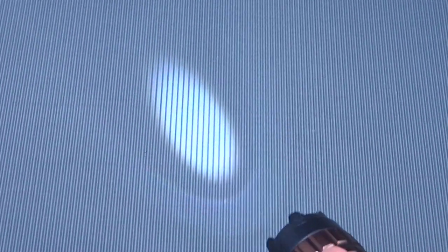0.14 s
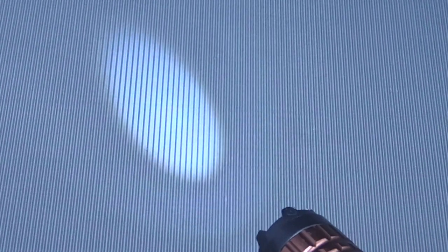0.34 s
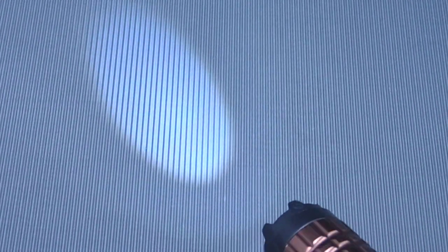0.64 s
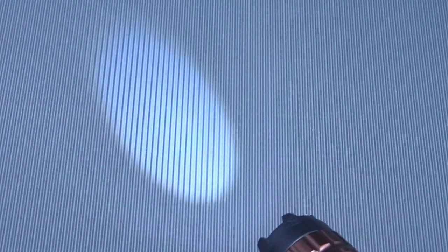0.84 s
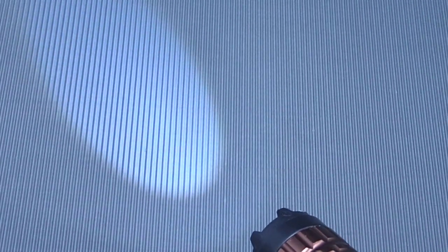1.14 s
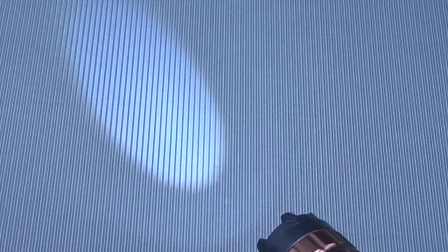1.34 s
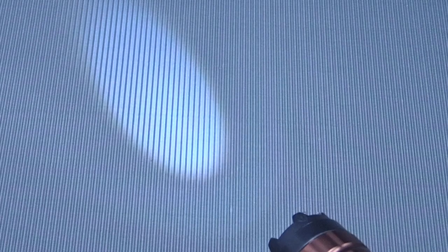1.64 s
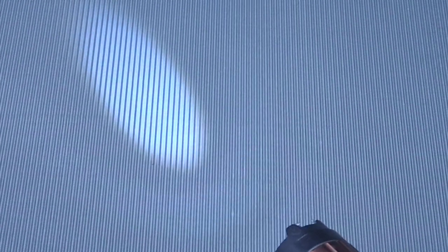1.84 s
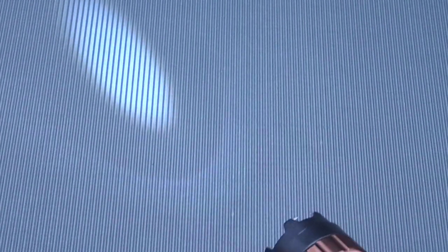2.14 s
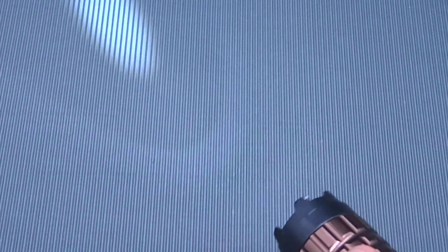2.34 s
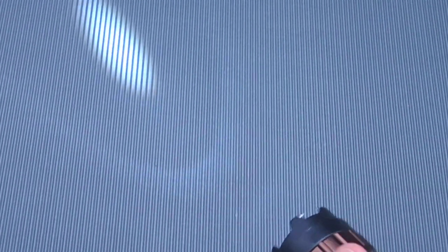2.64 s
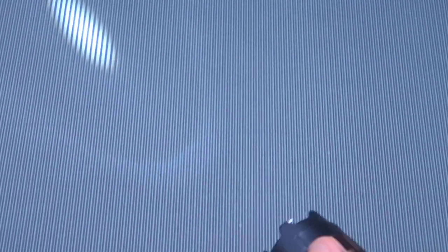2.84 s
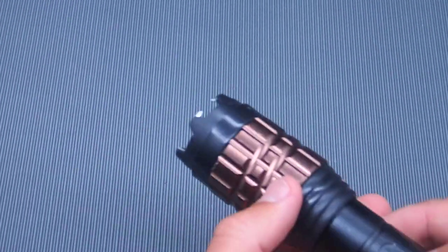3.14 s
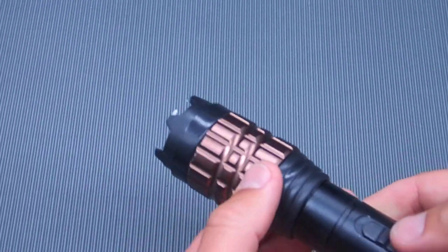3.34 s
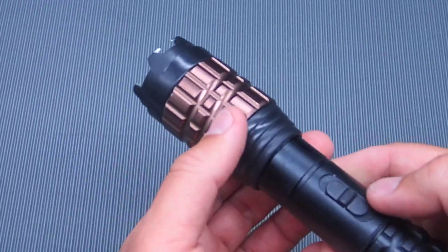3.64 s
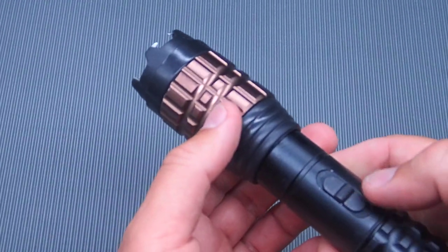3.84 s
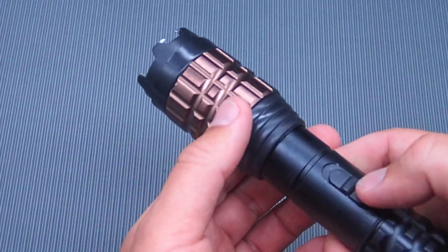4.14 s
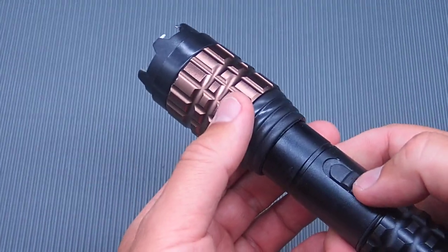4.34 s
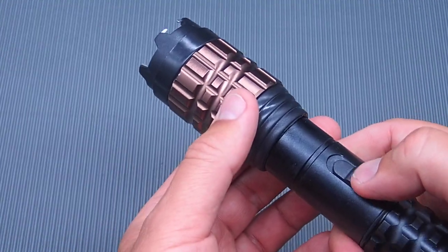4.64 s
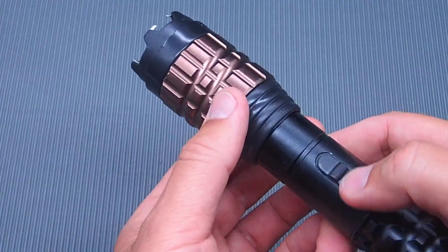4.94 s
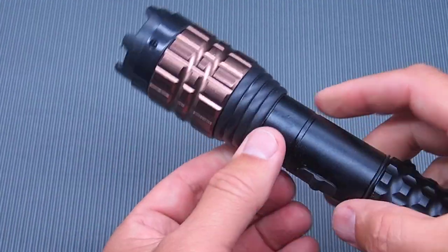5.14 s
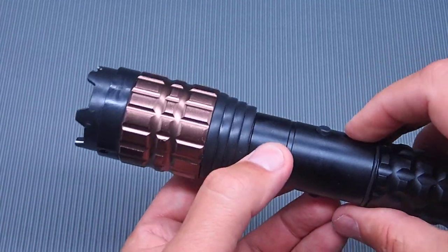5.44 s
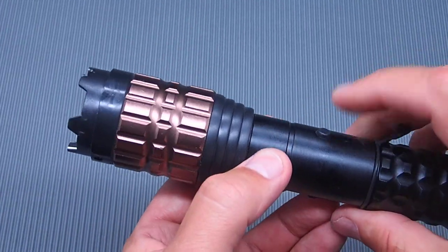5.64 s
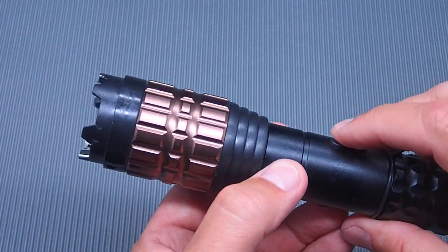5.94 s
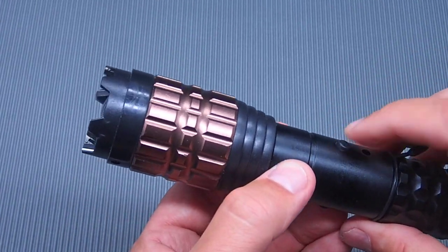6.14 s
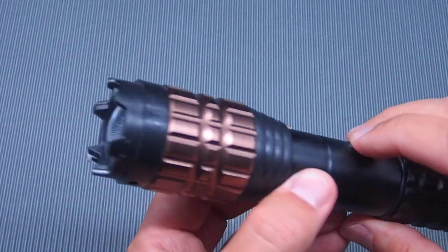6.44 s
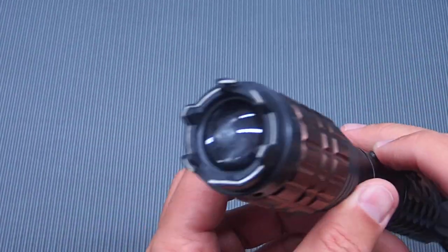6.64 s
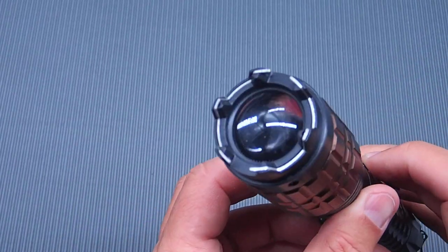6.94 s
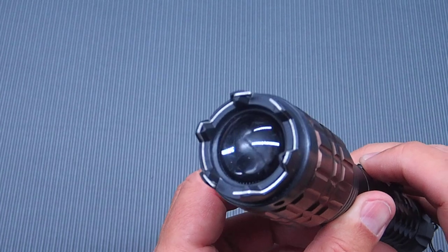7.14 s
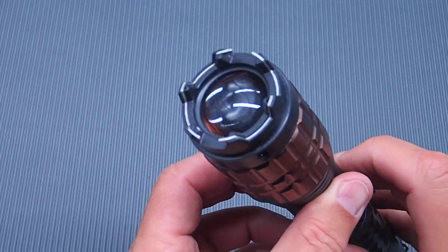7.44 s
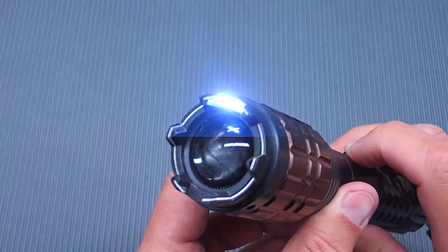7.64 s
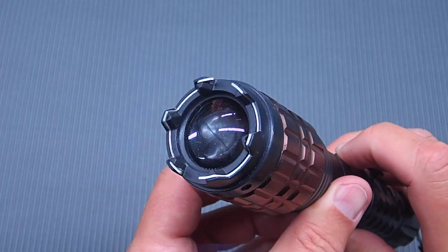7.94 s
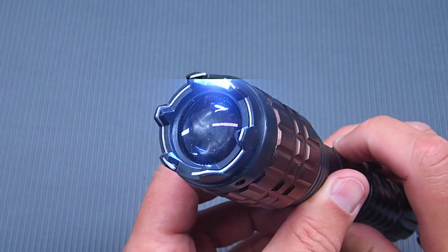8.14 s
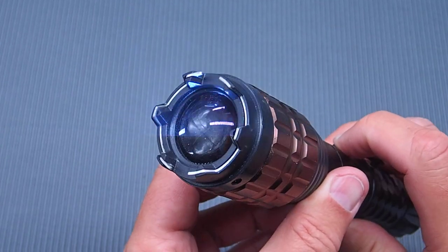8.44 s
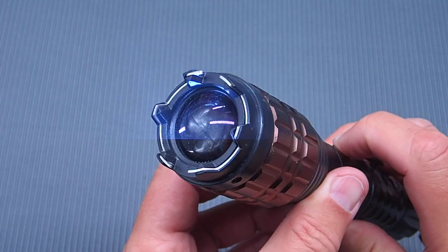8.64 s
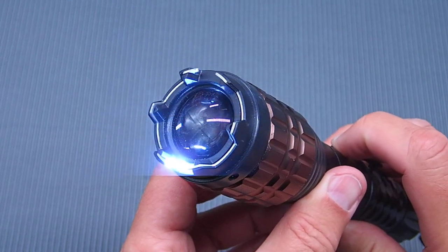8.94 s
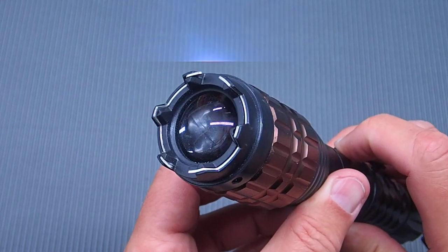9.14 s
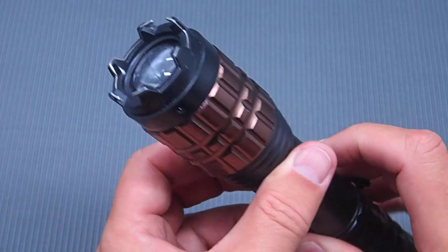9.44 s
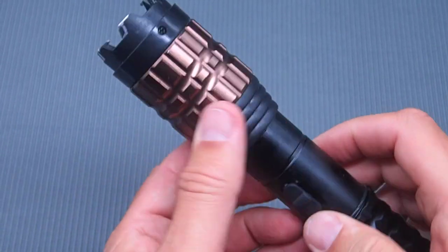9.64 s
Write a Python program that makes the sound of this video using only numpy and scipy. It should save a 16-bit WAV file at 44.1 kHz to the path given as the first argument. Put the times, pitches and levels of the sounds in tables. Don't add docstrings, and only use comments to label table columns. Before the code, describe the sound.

Close to a camera microphone in a small room, a torch's lens ring is twisted in short turns from 0.2 to 2.75 seconds. Each turn gives a quick run of two to six loud, sharp ratchet clicks, bright and brittle, ringing near 5.5 kHz, with small ticks of slack between. From 3.0 to 3.5 fingers rub softly and knock the hollow body. After a quiet gap, a slide switch snaps hard at 4.7 with a tiny bounce. From 5.0 to 6.9 come light taps and dry rubs, with a firmer knock at 6.8. A trigger double-clicks at 7.04, and at once a sharp first crack opens a harsh electric crackle, about 43 sparks a second, slightly irregular, with small low puffs beneath. It runs steadily until 9.4, then stops abruptly with a short tail. Faint room hiss ducks under loud sounds and creeps back.

```python
import sys
import numpy as np
from scipy import signal
from scipy.fft import rfft, irfft, next_fast_len
from scipy.io import wavfile
from scipy.ndimage import uniform_filter1d, minimum_filter1d

SR = 44100
rng = np.random.default_rng(int(sys.argv[2]) if len(sys.argv) > 2 else 0)


def master(y):
    cut = np.clip(np.atleast_2d(y).T, -1, 1)
    pcm = np.round(cut * 32767)
    wavfile.write(sys.argv[1], SR, pcm.astype(np.int16))


def invert_db(x):
    u = np.asarray(x, float) / 20
    return 10 ** u


N = 432621
T = np.arange(N) / SR

# (frequency [Hz], density [dB per Hz])
ROOM_SPECTRUM = [(20, -17.5), (92, -5.5), (530, -3.5), (800, -4.5), (1300, -6.5), (1900, -12), (2700, -20),
                 (3160, -17), (4200, -26.5), (4870, -10.5), (6500, -10.5), (8050, -7), (9500, -14),
                 (15500, -17.5)]
# (frequency [Hz], likeness [-1 to 1])
ROOM_LIKENESS = [(60, 0.088), (300, 0.31), (700, -0.11), (3100, 0.23), (6800, -0.43), (15000, 0.26)]
# (frequency [Hz], width [Hz], level [dB])
WHINES = [(4570, 31, -75), (6200, 35, -71), (8050, 60, -71)]
ROOM_DB = -53.5

# (time of maximum [s], level [dB], swell [s], fade [s]), both over STROKE_DB
STROKES = [(0.0, -34, .01, 0.025), (3.068, -41.5, 0.12, 0.48), (3.37, -49, 0.042, 0.065),
           (3.44, -54, 0.08, 0.12), (3.51, -57.5, 0.12, 0.0142), (5.21, -41.5, 0.013, 0.19),
           (5.33, -43, 0.07, 0.034), (5.462, -52, 0.069, 0.015), (5.827, -44.5, 0.011, 0.074),
           (5.986, -47.5, 0.0047, 0.072), (6.075, -39.5, 0.0035, 0.024), (6.53, -52, 0.11, .018),
           (6.766, -43, 0.22, 0.08), (6.832, -40, 0.008, 0.021), (6.91, -49, 0.045, .063)]
# (frequency [Hz], density [dB per Hz])
RUB_SPECTRUM = [(1470, -77.5), (2500, -21), (3130, -18), (4050, -21), (5190, 1), (6700, -8), (8080, -11.5),
                (9810, -23), (14600, -24.5), (16000, -8)]
STROKE_DB = 15

# (time [s], peak [dB], body minus peak [dB])
TAPS = [(3.3486, -35.5, -17), (4.959, -41.5, -20), (5.2071, -42, -22), (5.2125, -42, -22),
        (5.2253, -37, -16), (5.3597, -41, -19), (5.8205, -39, -15), (5.8767, -43, -20), (5.914, -47, -18),
        (5.9836, -47, -22), (6.074, -34, -32), (6.1559, -43.5, -24), (6.3, -30.5, -19.5),
        (6.6694, -40, -20)]
# (time [s], peak [dB], top minus peak [dB], body minus peak [dB])
KNOCKS = [
    (3.151, -36.5, -28, -20),
    (6.8315, -27.5, -32, -16.5),
    (6.839, -48, -32, -23),
]
# (time [s], peak [dB], top minus peak [dB], body minus peak [dB])
SWITCHES = [
    (4.6842, -5.5, -25, -38.5),
    (4.6905, -12, -33, -42),
    (7.0428, -14, -23.5, -31.5),
    (7.0478, -15, -22.5, -41.5),
]
# (time [s], peak [dB], top minus peak [dB], tick minus peak [dB], drag [dB])
TURNS = [
    (0.2155, -3, -10, -14, -12.5),
    (0.5944, -2.5, -5, -32, -9),
    (0.8915, 2, -10, -28, -17),
    (1.2488, 0, -10.5, -39, -29),
    (1.68, -0.5, -13, -29, -14.5),
    (2.0087, -5.5, -14.5, -34, -15),
    (2.3343, -6.5, -5, -26, -15.5),
    (2.6531, 1, -12, -37, -16.5),
]
# (time [s], peak [dB], top minus peak [dB], body minus peak [dB])
DETENTS = [(0.2358, -5, -8, -45), (0.2549, -7, -7, -43), (0.3021, -5.5, -5.5, -38.5),
           (0.3721, -6, -12, -39.5), (0.6014, -6.5, -30.5, -38.5), (0.6134, -3, -11.5, -44),
           (0.636, -4, -8.5, -45), (0.6728, -5, -13.5, -40), (0.9138, -12, -8.5, -32.5),
           (0.944, -9, -22, -57), (1.29, -3.5, -11, -42.5), (1.3369, -4, -4.5, -36.5),
           (1.3597, 0, -13, -42), (1.3837, -2.5, -19.5, -45.5), (1.4241, -5, -17, -36.5),
           (1.7107, -2.5, -12, -36), (1.742, -5.5, -10, -38), (1.781, -8.5, -10, -37),
           (2.02, -11, -28, -44), (2.0397, -6, -14, -37), (2.0706, -4, -14, -37.5), (2.0774, -16, -21, -44),
           (2.0986, -10.5, -7, -37), (2.1069, -9.5, -12, -48), (2.353, -9, -17, -39), (2.383, -9, -19, -48),
           (2.4276, -12.5, -11, -39), (2.6853, -3, -18, -44), (2.7106, -9, -19, -38)]
# (time [s], peak [dB], top minus peak [dB], body minus peak [dB])
SLACK = [(0.177, -37, -16, -26), (0.5087, -41, -15, -23), (0.5513, -21.5, -29, -31),
         (0.826, -42, -18.5, -23), (1.0091, -35.5, -25, -28), (1.6097, -45.5, -20, -27),
         (1.8529, -24, -7, -26.5), (2.173, -29, -6, -23), (2.2962, -36.5, -13, -20), (2.319, -25, -25, -28),
         (2.4235, -28, -15, -20), (2.5077, -41.5, -20, -30), (2.588, -36, -31, -41),
         (2.611, -20.5, -35, -27), (2.836, -38.5, -20, -16)]
# (time of maximum [s], peak [dB], frequency [Hz])
IMPACTS = [(0.2169, -6, 5510), (0.2202, -12, 5640), (0.2377, -10, 5780), (0.2405, -12, 6050),
           (0.2571, -9, 5550), (0.3041, -8, 5660), (0.3075, -12, 5340), (0.3737, -8, 5560),
           (0.3757, -10, 5780), (0.5906, -12, 5330), (0.5963, -6, 5930), (0.6017, -7, 5440),
           (0.6146, -7, 5830), (0.6179, -8, 5490), (0.6207, -11, 5440), (0.6376, -7, 5960),
           (0.6394, -10, 5520), (0.6753, -9, 5390), (0.891, -12, 5230), (0.8935, -6, 5100),
           (0.8951, -8, 5770), (0.8982, -8, 5150), (0.9146, -9, 5400), (0.9168, -11, 5450),
           (0.9465, -9, 5360), (1.2496, -7, 5580), (1.2525, -7, 5460), (1.2573, -10, 5700),
           (1.2915, -7, 5580), (1.2946, -10, 5020), (1.3379, -8, 5500), (1.3395, -8, 5280),
           (1.3605, -12, 5870), (1.3634, -8, 5720), (1.367, -11, 5470), (1.3866, -8, 5380),
           (1.3916, -11, 5200), (1.6819, -12, 5840), (1.6837, -6, 5540), (1.686, -9, 5510),
           (1.7126, -6, 5330), (1.7174, -9, 5290), (1.7462, -9, 5630), (1.7831, -10, 5190),
           (2.0144, -8, 5390), (2.0163, -12, 5470), (2.02, -10, 5570), (2.0415, -10, 5280),
           (2.0434, -10, 5800), (2.0727, -11, 5090), (2.0778, -9, 5580), (2.1029, -9, 5390),
           (2.3364, -6, 5190), (2.3864, -12, 5590), (2.6561, -9, 5190), (2.6581, -8, 5420),
           (2.6877, -8, 5770), (2.6896, -9, 5690), (4.6878, -9, 5740), (4.6919, -7, 5350)]
# (frequency [Hz], density [dB per Hz])
RATCHET_RING = [(2060, -66.5), (3500, -38.5), (4170, -39.5), (4530, -9.5), (4700, -20), (5010, -2.5),
                (5220, 2), (6750, -10.5), (8080, -13), (9060, -28.5), (10500, -27), (13600, -34),
                (22000, -120)]
# (frequency [Hz], density [dB per Hz])
TAP_RING = [(1290, -66.5), (2200, -27), (4200, -19.5), (4720, -20), (5090, 0), (5300, 1), (6640, -3.5),
            (7900, -4.5), (9970, -15), (10700, -15.5), (12400, -40), (15000, -18.5), (16000, -27.5)]
# (frequency [Hz], density [dB per Hz])
THIN_METAL = [(5880, -51.5), (10000, -12), (10600, -21), (11900, -13.5), (13300, 4), (13700, -1.5),
              (16000, -15.5)]
# (frequency [Hz], density [dB per Hz])
HOLLOW_BODY = [(500, -53.5), (780, 3), (1000, -7.5), (1500, -0.5), (1900, -7.5), (3000, -7.5), (4000, -13),
               (4500, -52.5)]
# (frequency [Hz], density [dB per Hz])
TICK_SPECTRUM = [(300, -50.5), (1500, 4), (3000, 7), (16000, 0.5)]
# (frequency [Hz], density [dB per Hz])
STRIKE_EDGE = [(1500, -34), (3000, -17.5), (4000, -10), (4800, -1), (7000, -4), (8500, -1), (10500, -11.5),
               (13300, -0.5), (16000, -12.5)]
# (frequency [Hz], level [dB], T60 [s])
STRUCK_MODES = [(5275, 1, 0.066), (5300, -5, 0.022), (5200, 11.5, 0.011), (13350, -24.5, .02)]
DETENT_KNOCK_HZ, TAP_KNOCK_HZ = (789, 1538), (997, 1240, 1410)
DRAG_LEAD_S, DRAG_TOP_DB, DRAG_BODY_DB, TAP_TOP_DB = 0.013, -41, -31, -21
TURN_T60_S, TURN_BODY_DB, SHARP_TICK_DB, BODY_LOSS = 0.066, -40, -31.5, 2.3
# (tick minus peak [dB], T60 [s])
DETENT_SNAP, SLACK_SNAP, DRAG_SNAP = (-35.5, 0.074), (-26, 0.073), (-45, 0.14)
SWITCH_SNAP, TAP_SNAP, KNOCK_SNAP = (-22.5, 0.045), (-25, 0.084), (-16, 0.016)
IMPACT_MS, IMPACT_TICK_DB, IMPACT_LIKENESS = 0.65, -13, 0.8
HAND_LIMIT_DB, STRIKE_KNEE_DB = -13, -20

GATE_DB, GATE_SLOPE, HOLD_S, RELEASE_DB_PER_S = -17.5, 0.92, 0.085, 80
SPARK_DUCK_DB, SPARK_HOLD_S = -27, 0.084

# (start [s], sparks [count], gap [0 or 1])
STRETCHES = [(7.0633, 1, 0), (7.089, 5, 0), (7.2112, 1, 1), (7.2335, 5, 0), (7.3493, 4, 1), (7.4418, 1, 0),
             (7.4648, 5, 1), (7.5789, 3, 1), (7.6468, 2, 0), (7.693, 5, 1), (7.8032, 1, 0), (7.8248, 2, 1),
             (7.8728, 3, 0), (7.9398, 1, 1), (7.9636, 1, 0), (7.9863, 5, 1), (8.106, 5, 0), (8.2267, 1, 1),
             (8.2497, 1, 0), (8.2717, 1, 1), (8.2952, 1, 0), (8.3175, 2, 1), (8.3627, 1, 0), (8.3871, 5, 1),
             (8.497, 4, 1), (8.5858, 1, 0), (8.609, 1, 1), (8.6318, 1, 0), (8.6518, 2, 1), (8.6967, 1, 0),
             (8.7184, 1, 1), (8.7425, 1, 0), (8.7646, 1, 1), (8.7869, 5, 0), (8.9052, 5, 1), (9.0207, 2, 1),
             (9.0687, 5, 0), (9.194, 1, 0), (9.2175, 5, 1), (9.3404, 2, 1)]
# (time [s], level [dB], body minus level [dB])
SPARK_LEVELS = [(7.09, -18, -19), (7.16, -17.5, -22), (7.33, -18, -21), (7.361, -17.5, -21),
                (7.52, -18, -21), (7.65, -20, -21.5), (7.84, -20, -21.5), (8.2, -19.5, -21.5),
                (8.4, -20, -21), (9.192, -19.5, -21), (9.4, -19.5, -22.5)]
# (frequency [Hz], density [dB per Hz])
SPARK_SPECTRUM = [(30, -82.5), (90, -50.5), (373, -27), (872, -25.5), (1200, -21.5), (1650, -22.5),
                  (1870, -29), (4110, -26.5), (4980, -3.5), (5770, -0.5), (7100, -11), (7900, -2.5),
                  (8700, -8.5), (10900, -13), (15000, -8.5)]
# (from [Hz], to [Hz], rise [ms], plateau [ms], T60 [s], late level [dB],
# left-right likeness [0 to 1], left minus right [dB])
SPARK_BANDS = [(20, 1800, 0.19, 4.9, 0.038, -44.5, 0, 1.5), (1789, 4000, 0.32, 4.3, 0.1, -49, 0.78, 0.5),
               (4020, 7120, 0.075, 5.8, 0.068, -34.5, 0.56, 0.5),
               (6860, 8740, 0.49, 5.4, 0.074, -39, 0.3, -2),
               (8740, 15700, 0.38, 2.2, 0.081, -42, 0.1, -0.5)]
# (delay [ms], level over the diffuse sound [dB])
SPARK_ECHOES = [(1.0, 0), (4.8, 1), (7, -4), (10.5, -2.5), (14.7, -4.5)]
# (frequency [Hz], level [dB], T60 [s])
CRACK_MODES = [(5220, -19, 0.018), (5460, 4, 0.012), (5690, 5, 0.04), (6560, -16.5, 0.068),
               (7930, -13, 0.2)]
# (frequency [Hz], level [dB], T60 [s])
THUMP_MODES = [(85, -2, 0.022), (190, -7, 0.01), (446, -8.5, 0.0057), (893, -14, 0.012)]
# (time [s], frequency [Hz], level [dB])
PUFFS = [(7.06, 698, 22), (7.2, 750, 12), (7.33, 698, -15), (7.35, 1100, 18), (7.55, 1000, 14),
         (7.62, 800, 0), (8.0, 800, -6), (8.4, 900, -1), (8.9, 800, -7)]
LAST_SPARK_S, SPARK_JITTER_S, SPARK_LAG_S, LATE_T60_S = 9.3889, 0.0007, 0.0004, 0.36
SHARED_PATH, BASS_DRIFT = 0.55, 0.6
LIMIT_DB, LIMIT_MS = 2.5, 2.4
FIRST_DB = 26.5

# (frequency [Hz], width [Hz], depth [0 to 1])
NOTCHES = [(1869, 83, 1), (2593, 130, 0.66), (3452, 97, 1), (3980, 100, 0.3)]
TOP_HZ = 15720


def curve(points, hz):
    f, v = np.transpose(points)
    return np.interp(np.log(hz + 1e-9), np.log(f), v)


def unit(x):
    return x / np.sqrt(np.mean(x ** 2))


def panned(db):
    return invert_db(np.array([[db], [-db]]) / 2)


def colour(x, points):
    size = 2048
    cepstrum = irfft(curve(points, np.fft.rfftfreq(size, 1 / SR)) * np.log(10) / 20)
    cepstrum[1:size // 2] *= 2
    cepstrum[size // 2 + 1:] = 0
    h = irfft(np.exp(rfft(cepstrum)))[:size // 2]
    h = h / np.linalg.norm(h)
    on = np.flatnonzero(x.any(0))
    span = slice(on[0], on[-1] + size)
    part = x[:, span]
    out = np.zeros_like(x)
    out[:, span] = signal.oaconvolve(part, h[None], axes=-1)[:, :part.shape[-1]]
    return out


def pair(noise, like):
    like = np.clip(like, -1, 1)
    mid = noise[0] * np.sqrt((1 + like) / 2)
    side = noise[1] * np.sqrt((1 - like) / 2)
    return np.array([mid + side, mid - side])


def lumps(shape, hz, depth_db):
    k = int(SR / hz)
    v = uniform_filter1d(uniform_filter1d(rng.standard_normal(shape), k), k)
    return invert_db(depth_db * unit(v))


def rings(modes, t):
    return sum(invert_db(db - 60 * t / t60) * np.sin(2 * np.pi * hz * t) for hz, db, t60 in modes)


def room():
    size = next_fast_len(N, True)
    hz = np.fft.rfftfreq(size, 1 / SR)
    spectrum = pair(rfft(rng.standard_normal((2, size))), curve(ROOM_LIKENESS, hz))
    noise = irfft(spectrum * invert_db(curve(ROOM_SPECTRUM, hz)), size)[:, :N]
    return invert_db(ROOM_DB) * panned(2) * noise / np.std(noise.mean(0))


def whines():
    tones = 0
    for hz, width, db in WHINES:
        b, a = signal.iirpeak(hz, hz / width, SR)
        tones = tones + invert_db(db) * unit(signal.lfilter(b, a, rng.standard_normal(N)))
    return tones * lumps((len(WHINES), N), 9, 4.0).sum(0) / 3


def gain_db(near):
    loud_db = 10 * np.log10(uniform_filter1d(near[0] ** 2, 128) + 1e-12)
    hold = int(HOLD_S * SR) // 2
    want = -GATE_SLOPE * np.maximum(loud_db - GATE_DB, 0)
    want = minimum_filter1d(want, 2 * hold + 1, origin=hold)
    want += SPARK_DUCK_DB * ((T > STRETCHES[0][0]) & (T < LAST_SPARK_S + SPARK_HOLD_S))
    climb = RELEASE_DB_PER_S * T
    return climb + np.minimum.accumulate(want - climb)


def rubs():
    level = 0
    for s, db, swell, fade in STROKES:
        level = level + invert_db(db - STROKE_DB * np.maximum((s - T) / swell, (T - s) / fade))
    slips = lumps(N, 150, 2.4) * pair(rng.standard_normal((2, N)), 0.7)
    return colour(level * slips * panned(2), RUB_SPECTRUM)


def snaps(table, kind):
    return [(*row[:4], *kind) for row in table]


def clicks(table, ring_points, knock_hz, rise_ms=0.87, early_db=5, early_ms=5, tail_db=-24, tail_s=0.22,
           body_ms=5, knock_db=-5, tick_gain_db=10, strike_db=-3):
    size = 6144
    t = np.arange(size) / SR
    ring, top, body, direct, tick = np.zeros((5, 2, N + size))
    rise = 1 - np.exp(-t * 1e3 / rise_ms)
    early = (1 + invert_db(early_db) * np.exp(-t * 1e3 / early_ms)) / (1 + invert_db(early_db))
    tail = invert_db(tail_db - 60 * t / tail_s)
    for s, peak_db, top_db, body_db, tick_db, t60 in table:
        i = int(s * SR)
        span = slice(i, i + size)
        rattle = lumps(size, 600, 2.5)
        burst = invert_db(peak_db - 6.5) * rise * (invert_db(-60 * t / max(t60, 0.01)) * rattle * early + tail)
        ring[:, span] += burst * pair(rng.standard_normal((2, size)), 0.6)
        top[:, span] += invert_db(top_db) * burst * pair(rng.standard_normal((2, size)), 0.18)
        slow = invert_db(peak_db + body_db) * (1 - np.exp(-t * 1e3 / body_ms))
        body[:, span] += invert_db(4.0 - 60 * t / 0.083) * slow * pair(rng.standard_normal((2, size)), 1.0)
        knock = [(hz, 4 * rng.standard_normal(), 0.07) for hz in knock_hz]
        direct[:, span] += invert_db(knock_db) * slow * rings(knock, t)
        struck = [(hz * (1 + 0.019 * rng.standard_normal()), db, decay) for hz, db, decay in STRUCK_MODES]
        direct[:, span] += invert_db(peak_db + strike_db) * rise * rings(struck, t)
        i += int(rise_ms * SR / 1e3)
        contact = np.exp(-t / 0.00062) * rng.standard_normal(size)
        tick[:, i:i + size] += invert_db(peak_db + tick_db + tick_gain_db) * contact
    heard = colour(ring, ring_points) + colour(top, THIN_METAL) + colour(body, HOLLOW_BODY)
    heard += colour(tick, TICK_SPECTRUM) + direct
    return panned(1.0) * heard[:, :N]


def taps():
    fingers = [(s, peak_db, TAP_TOP_DB, body_db) for s, peak_db, body_db in TAPS]
    light = clicks(snaps(fingers, TAP_SNAP) + snaps(SWITCHES, SWITCH_SNAP), TAP_RING, TAP_KNOCK_HZ,
                   rise_ms=0.23, early_db=-1.5, early_ms=8.0, tail_db=-19, tail_s=0.15, body_ms=0.72,
                   knock_db=-2.5, tick_gain_db=11.0, strike_db=-16.0)
    return light + clicks(snaps(KNOCKS, KNOCK_SNAP), TAP_RING, TAP_KNOCK_HZ,
                          body_ms=0.52, knock_db=3, strike_db=-5.0)


def ratchet():
    slopes = [(row[0] - DRAG_LEAD_S, row[4], DRAG_TOP_DB, DRAG_BODY_DB) for row in TURNS]
    drags = clicks(snaps(slopes, DRAG_SNAP), RATCHET_RING, DETENT_KNOCK_HZ,
                   rise_ms=7, early_db=-20, strike_db=-30)
    firsts = []
    for s, peak_db, top_db, tick_db, _ in TURNS:
        body_db = TURN_BODY_DB - BODY_LOSS * max(tick_db - SHARP_TICK_DB, 0)
        firsts.append((s, peak_db, top_db, body_db, tick_db, TURN_T60_S))
    events = firsts + snaps(DETENTS, DETENT_SNAP) + snaps(SLACK, SLACK_SNAP)
    return drags + clicks(events, RATCHET_RING, DETENT_KNOCK_HZ, early_db=-1.0, strike_db=-13)


def impacts():
    before = 128
    ms = np.arange(-before, 384) * 1e3 / SR
    swell = np.exp(-(ms / (IMPACT_MS * np.where(ms < 0, 0.8, 1.25))) ** 2)
    ring, edge = np.zeros((2, 2, N))
    for s, db, hz in IMPACTS:
        at = int(s * SR) - before + np.arange(len(ms))
        turn = rng.standard_normal(2)
        apart = (1 - IMPACT_LIKENESS) * turn[1] * np.array([[1], [-1]])
        phase = 2 * np.pi * hz * ms / 1e3 + 10 * turn[0] + apart
        ring[:, at] += invert_db(db) * swell * np.sin(phase)
        edge[:, at] += invert_db(db + IMPACT_TICK_DB) * swell ** 2 * pair(rng.standard_normal((2, len(ms))), 0.36)
    return panned(1.6) * (ring + colour(edge, STRIKE_EDGE))


def limited(x):
    power = uniform_filter1d(np.mean(x ** 2, 0), 64)
    return x / (1 + (power / invert_db(2 * HAND_LIMIT_DB)) ** 2) ** 0.25


def hands():
    rattle = limited(ratchet() + taps() + rubs())
    strikes = impacts()
    power = uniform_filter1d(np.mean(strikes ** 2, 0), 48)
    return strikes + rattle / np.sqrt(1 + power / invert_db(2 * STRIKE_KNEE_DB))


def spark_times():
    start, count, gap = np.transpose(STRETCHES)
    done = np.append(0, np.cumsum(count))
    k = np.arange(done[-1] + 1)
    jitter = SPARK_JITTER_S * rng.standard_normal(len(k)) * ~np.isin(k, done)
    times = np.interp(k, done, np.append(start, LAST_SPARK_S)) + jitter + SPARK_LAG_S
    gaps = np.append(np.repeat(gap, count.astype(int)), 1)
    return zip(times, gaps.astype(int))


def spark_decays(ms, hz):
    echoes = 1 + sum((invert_db(db) - 1) * np.exp(-(ms - at) ** 2) for at, db in SPARK_ECHOES)
    late = -60 * ms / (LATE_T60_S * 1e3)
    decays = []
    for lo, hi, rise, flat, t60, late_db, like, pan_db in SPARK_BANDS:
        fade = invert_db(-60 * np.maximum(ms - flat, 0) / (t60 * 1e3)) * echoes + invert_db(late_db + late)
        decays.append(((hz >= lo) & (hz < hi), (1 - np.exp(-ms / rise)) * fade, like, panned(pan_db)))
    return decays


def puff(at, gap, ms):
    s, hz, db = np.transpose(PUFFS)
    swing = ms * 1.5 * np.exp(-ms / 0.96) * np.sin(2 * np.pi * np.interp(at, s, hz) * ms / 1e3)
    return invert_db(np.interp(at, s, db) - 22 + 4 * gap) * swing


def sparks():
    size = 12288
    drift, own, bass_hold = 0.14, 0.22, 3
    ms, hz = np.arange(size) * 1e3 / SR, np.fft.rfftfreq(size, 1 / SR)
    decays = spark_decays(ms, hz)
    crack = invert_db(-17.5) * rings(CRACK_MODES, ms / 1e3)
    thump = invert_db(-1.5) * rings(THUMP_MODES, ms / 1e3)
    paths = rng.standard_normal((3, 2, size))
    paths = (paths[:2] + SHARED_PATH * paths[2]) / np.hypot(1, SHARED_PATH)
    bass = rng.standard_normal((2, 2, size))
    low, high = np.zeros((2, 2, N + size))
    for at, gap in spark_times():
        fresh = rng.standard_normal((2, 2, size))
        paths[gap] = (paths[gap] + drift * fresh[0]) / np.hypot(1, drift)
        bass[gap] = (bass[gap] + BASS_DRIFT * fresh[0]) / np.hypot(1, BASS_DRIFT)
        long_waves = rfft(fresh[1] + bass_hold * bass[gap]) / np.hypot(1, bass_hold)
        spectrum = np.where(hz < 1800, long_waves, rfft(paths[gap] + own * fresh[1]))
        parts = [pair(irfft(spectrum * band), like) * fade * pan for band, fade, like, pan in decays]
        gain = invert_db(0.4 * rng.standard_normal())
        i = int(at * SR)
        thud = thump * invert_db(2.9 * fresh[1, 0, 0])
        low[:, i:i + size] += (sum(parts[:2]) + thud + puff(at, gap, ms)) * gain
        high[:, i:i + size] += (sum(parts[2:]) + crack) * gain
    low, high = colour(low[:, :N], SPARK_SPECTRUM), colour(high[:, :N], SPARK_SPECTRUM)
    s, level_db, body_db = np.transpose(SPARK_LEVELS)
    steady = (T > s[0]) & (T < s[-1])

    def scaled(x):
        return x / np.std(x.mean(0)[steady])

    train = scaled(high) + invert_db(np.interp(T, s, body_db)) * scaled(low)
    power = uniform_filter1d(np.mean(train ** 2, 0), int(LIMIT_MS * SR / 1e3))
    train = scaled(train / np.sqrt(1 + power / invert_db(2 * LIMIT_DB)))
    first = np.zeros((1, N))
    onset = int((STRETCHES[0][0] + SPARK_LAG_S) * SR)
    first[0, onset + np.array([3, 7, 11, 20, 24, 33])] = invert_db(FIRST_DB) * np.array([1, -1, 1, 1, -1, -1])
    return invert_db(np.interp(T, s, level_db)) * (train + colour(first, SPARK_SPECTRUM))


def scene():
    near = hands()
    gain = gain_db(near)
    rise = np.where(T > LAST_SPARK_S, gain - SPARK_DUCK_DB, 0)
    return near + invert_db(rise) * sparks() + invert_db(gain) * (room() + whines())


def top_cut(x):
    return signal.sosfilt(signal.butter(12, 16410, fs=SR, output="sos"), x)


def record(dry):
    for hz, width, depth in NOTCHES:
        b, a = signal.iirpeak(hz, hz / width, SR)
        dry = dry - np.clip(depth, 0, 1) * signal.lfilter(b, a, dry)
    low_pass = signal.ellip(10, 0.5, 60, TOP_HZ, fs=SR, output="sos")
    clipped = np.clip(signal.sosfilt(low_pass, dry), -1, 1)
    dc_block = signal.butter(1, 22, "high", fs=SR, output="sos")
    return top_cut(signal.sosfilt(dc_block, clipped))


dry = scene()
out = record(dry)
master(out)
```